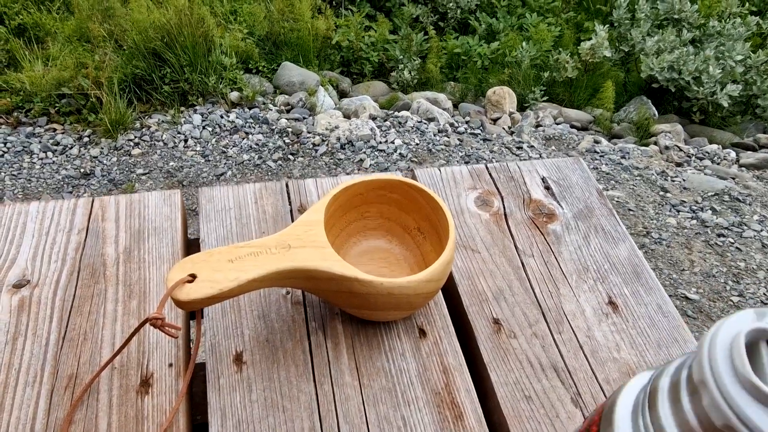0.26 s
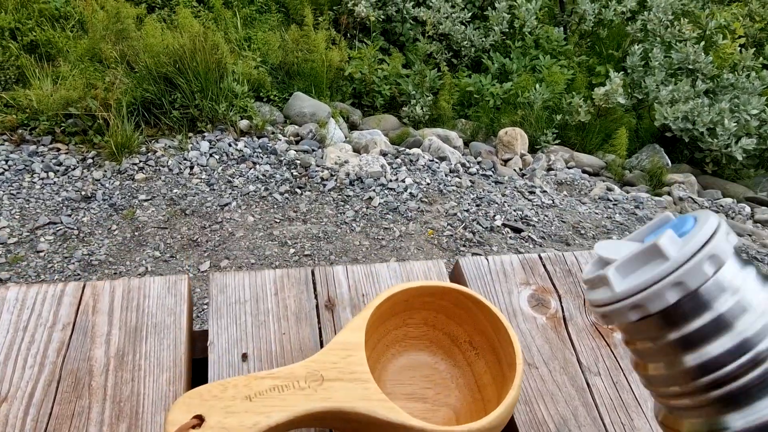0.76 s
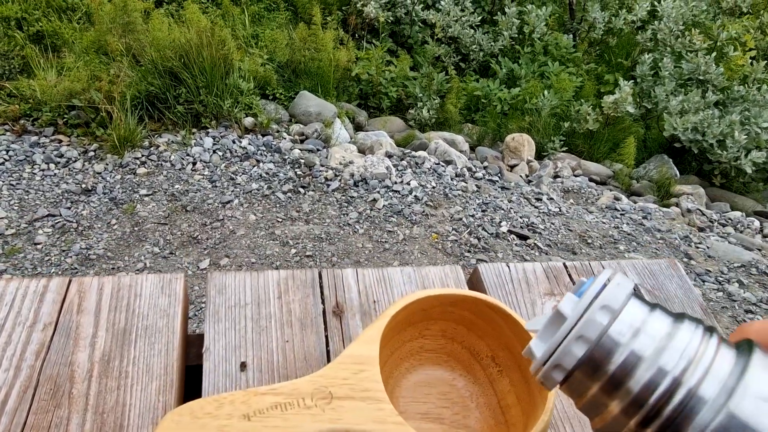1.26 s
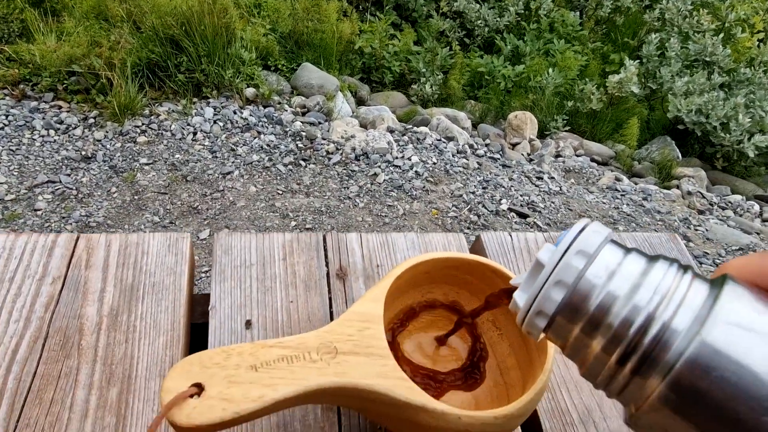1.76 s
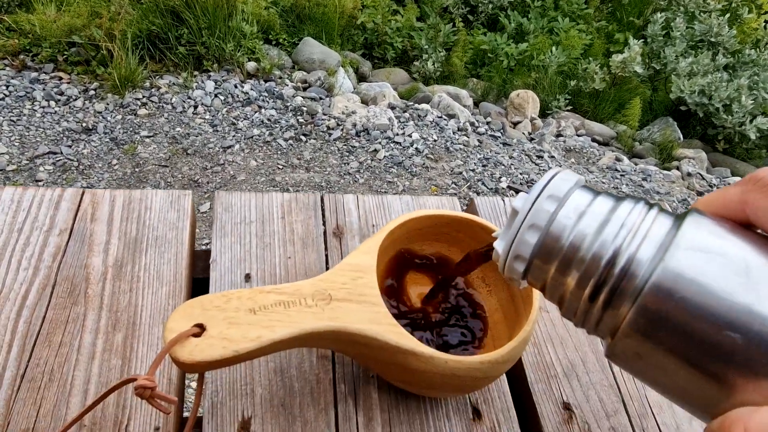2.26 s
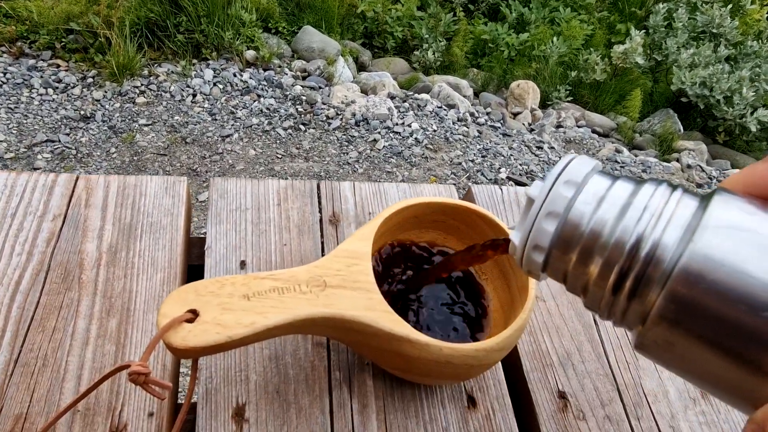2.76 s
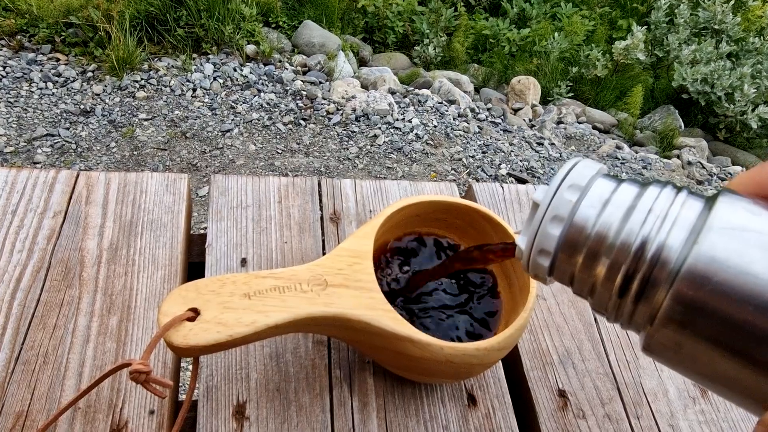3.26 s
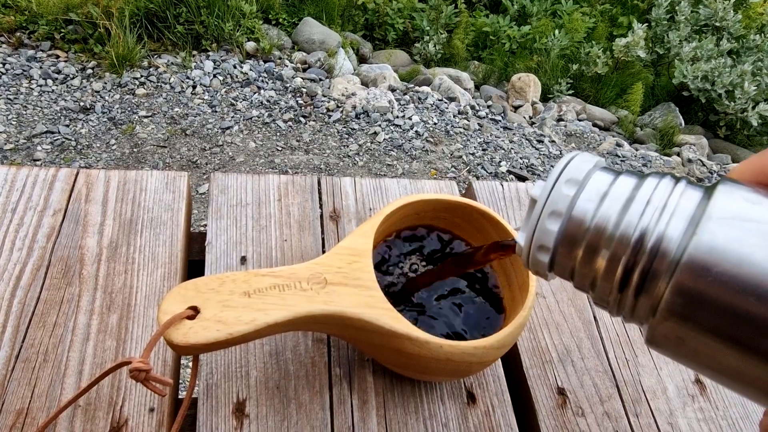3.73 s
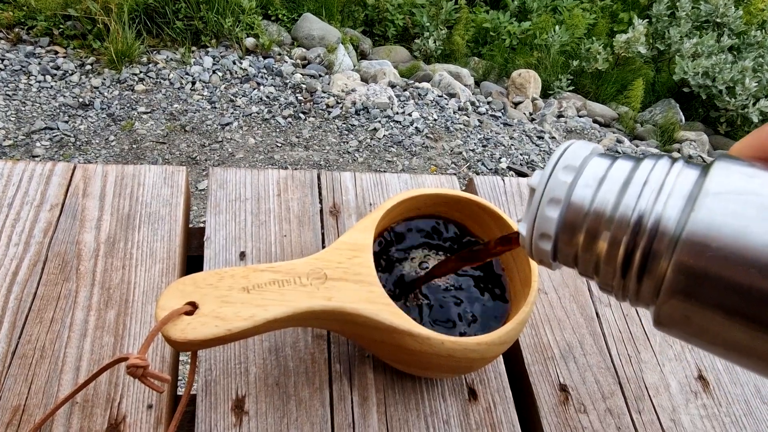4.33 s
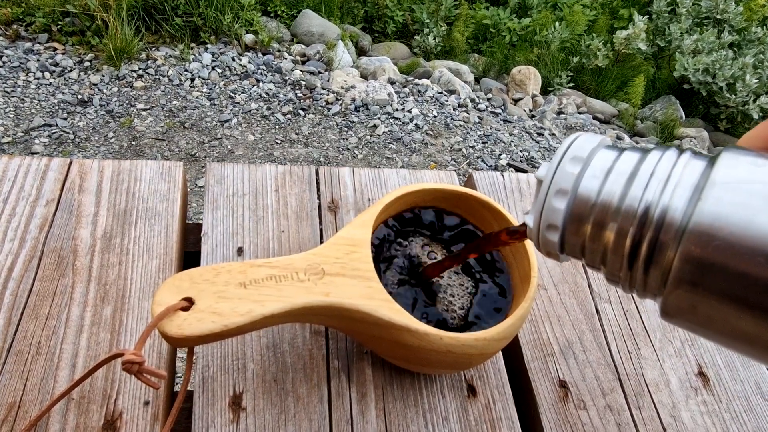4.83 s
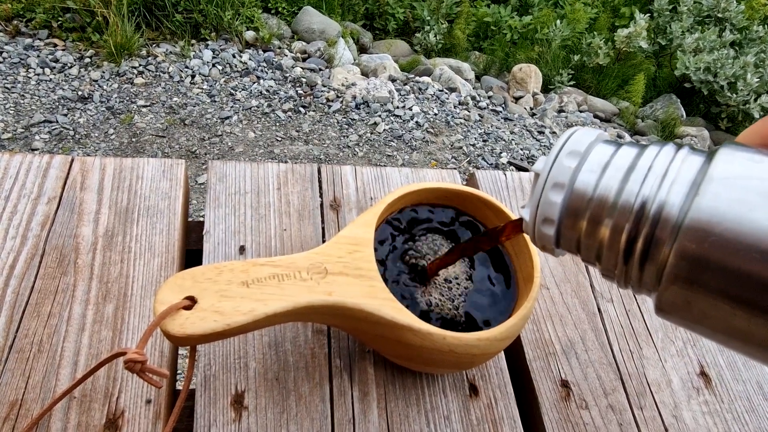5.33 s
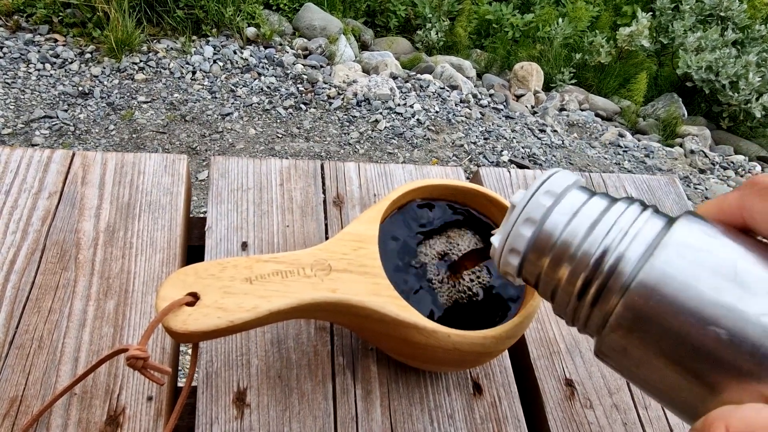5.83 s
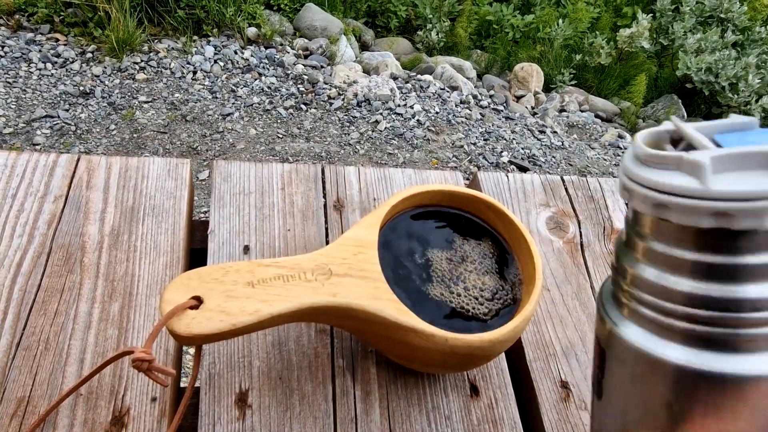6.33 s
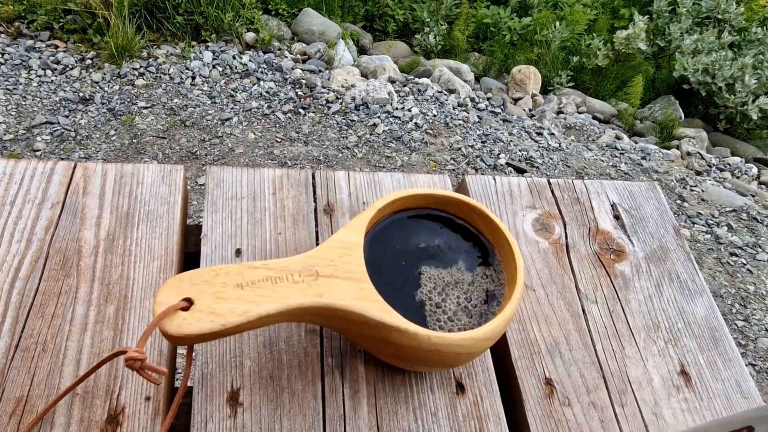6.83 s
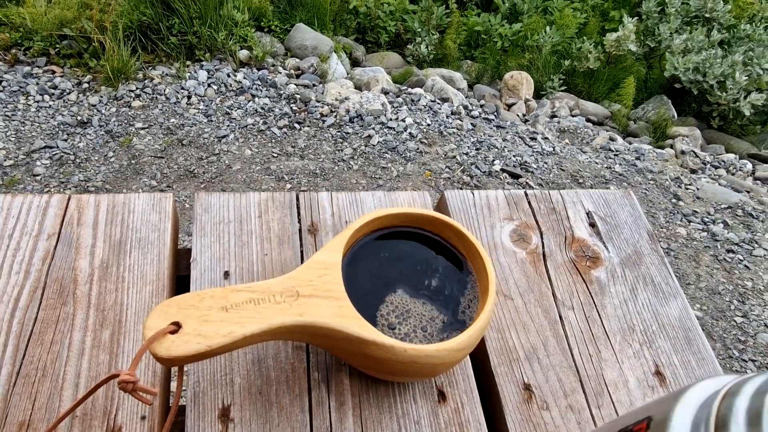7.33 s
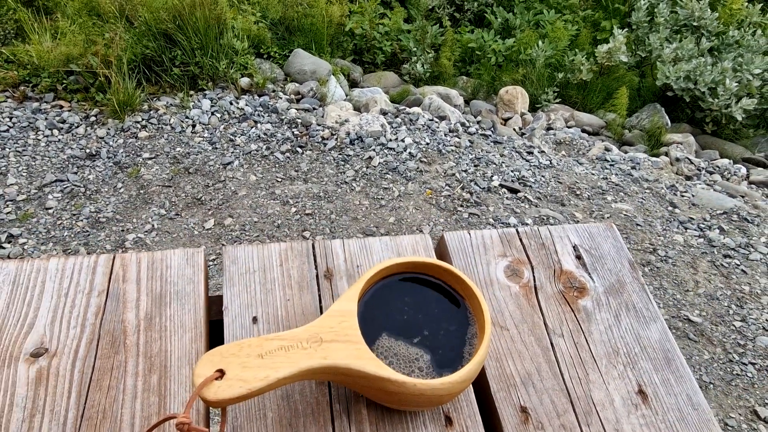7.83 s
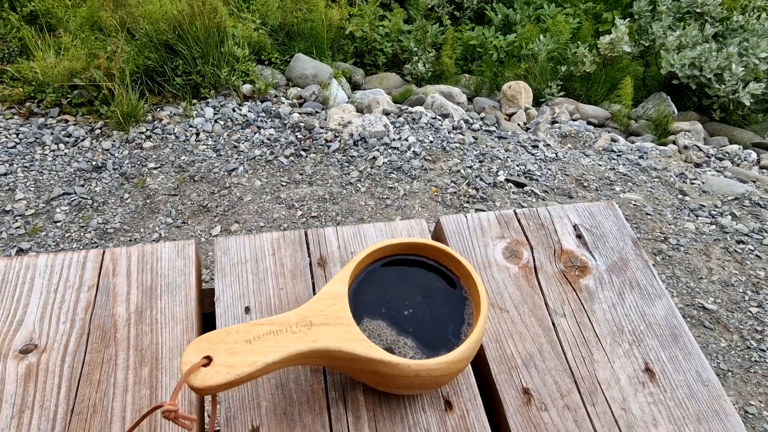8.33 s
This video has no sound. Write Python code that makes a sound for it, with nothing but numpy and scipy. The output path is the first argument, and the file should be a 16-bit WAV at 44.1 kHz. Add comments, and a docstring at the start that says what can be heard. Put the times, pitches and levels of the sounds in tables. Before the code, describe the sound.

Hot coffee trickles from a steel flask into a wooden cup outdoors, bubbling and fizzing, then a sharp stopper click and knocks on planks.

```python
"""Coffee pours in a thin stream from a steel flask into a wooden cup, outdoors, close to a phone.
Trapped bubbles ring and shake the cup, whose lowest mode sinks as it fills; fizz, wet hiss and spray fill the gaps.
Decaying modes and noise bursts make the knocks on a plank table, the stopper snapping shut and the flask set down.
Fingers scrape the steel as stick-slip ticks, a sleeve swishes as shaped noise, and a light wind
buffets the microphone over a faint hush."""
import sys
import numpy as np
from scipy import signal
from scipy.fft import rfft, irfft, next_fast_len
from scipy.io import wavfile
from scipy.ndimage import uniform_filter1d

SR = 44100
rng = np.random.default_rng(int(sys.argv[2]) if len(sys.argv) > 2 else 0)


def bounce(signal):
    """Save signal as a 16-bit WAV file at the path given by the first command-line argument."""
    frames = np.transpose(np.atleast_2d(signal))
    limited = np.clip(frames, -1, 1)
    pcm = np.round(limited * 32767).astype(np.int16)
    wavfile.write(sys.argv[1], SR, pcm)


N = 378819
TIME = np.arange(N) / SR  # seconds

# Table levels are relative: the functions add their trims, scatter and panning.

# Steady outdoor hush. Each row: frequency in Hz, level in dB.
HUSH_COLOUR = [(100, 8.5), (260, 4.5), (800, -3.5), (1600, -0.5), (4200, -7.5), (8500, -8.5), (11000, -23)]

# Wind on the microphone. Each row: time in seconds, level in dB.
WIND_LEVEL = [(0, -62), (.6, -49), (1.05, -38.5), (1.5, -29), (2.3, -29.5), (2.54, -39.5), (3.07, -48),
              (3.2, -41), (4.08, -40.5), (4.3, -56), (4.7, -48), (5.52, -37.5), (5.8, -61.5), (6.15, -60.5),
              (6.4, -51), (7.15, -38.5), (7.7, -49.5), (8.59, -36)]
# Spectrum of the wind rumble. Each row: frequency in Hz, level in dB.
WIND_SPECTRUM = [(12, -31), (22, -7), (48, 0), (70, 1), (130, -17), (330, -42.5), (600, -65), (1200, -78.5),
                 (2000, -110)]
# Strongest eddies hitting a microphone port. Each row: start in seconds, peak in dB.
STRONG_EDDIES = [(1.414, -12), (1.473, -15.5), (1.532, -17), (1.655, -18), (1.745, -19), (1.86, -20),
                 (2.0, -22), (2.119, -15), (2.145, -16), (2.311, -13.5), (3.7, -26.5)]
# Spectrum of an eddy. Each row: frequency in Hz, level in dB.
EDDY_COLOUR = [(25, 0.5), (70, 8.5), (130, 1.0), (300, -31.5), (750, -47), (1500, -73.5), (4000, -100)]

# Moves of the arm in its sleeve. Each row: moment of top speed in seconds, rise in seconds,
# fall in seconds, soft swish in dB, hiss of sliding cloth in dB.
ARM_STROKES = [(0.199, 0.054, 0.046, -57, -49.5), (0.45, 0.34, 0.3, -55, -67),
               (1.0, 0.54, 0.19, -61.5, -83), (1.9, 0.07, 0.23, -62, -76.5),
               (6.39, 0.14, 0.084, -64, -71.5), (6.725, 0.1, 0.1, -104, -54),
               (6.995, 0.15, 0.16, -70.5, -61.5), (7.35, 0.031, 0.033, -54.5, -54),
               (8.48, 0.11, 0.079, -51, -63)]
# Spectrum of the soft swish. Each row: frequency in Hz, level in dB.
SWISH_SPECTRUM = [(300, -4), (1000, -3.5), (1400, 1.5), (2900, -2), (3600, -5), (5500, -5), (11000, -18),
                  (16000, -24.5)]
# Spectrum of the sliding cloth. Each row: frequency in Hz, level in dB.
HISS_SPECTRUM = [(500, -8), (2700, -28.5), (3500, -0.5), (4900, -11), (6500, -2.5), (10500, -6), (13500, 0),
                 (16000, -4)]
# the sleeve never quite rests while the flask is put away
RUSTLE_DB, RUSTLE_FROM_S = -70, 6.3

# Fingers shifting their grip on the flask. Each row: start in seconds, length in seconds, peak in dB.
GRIP_SCRAPES = [(6.33, 0.0093, -40.5), (6.536, 0.017, -46), (6.566, 0.006, -45), (6.69, 0.0078, -58),
                (6.71, 0.037, -42), (6.858, 0.016, -49), (8.05, .008, -45), (8.268, 0.0068, -48)]
# Modes of the steel wall under the hand. Each row: frequency in Hz, level in dB, t60 in seconds.
HAND_DAMPED_STEEL = [(1340, -2, 0.064), (3374, 4, 0.058), (4200, 6, 0.012), (6500, 7, 0.0064)]

# Knocks of flask and hand on the table. Each row: start in seconds, planks in dB, steel ring in dB,
# contact crack in dB, thump cut-off in Hz (lower for a softer contact).
TABLE_KNOCKS = [(0.001, -61.5, -49.5, -45, 710), (0.046, -64, -58, -46.5, 700),
                (0.161, -30.5, -47, -47, 517), (0.197, -38.5, -67, -62, 246), (6.412, -29, -62, -48, 1600),
                (6.452, -44.5, -77, -60.5, 900), (6.752, -55.5, -73, -73, 1200),
                (7.084, -33.5, -44, -27, 1200), (7.321, -57, -68, -49.5, 596),
                (7.356, -37.5, -52, -52.5, 690), (7.868, -12, -31, -34, 1020),
                (8.134, -57.5, -59, -63, 503), (8.194, -36, -67, -51, 346), (8.21, -35, -65, -51.5, 395),
                (8.303, -26, -64.5, -57, 300), (8.495, -19, -88, -48.5, 480), (8.577, -28, -66, -54.5, 400)]
# Modes of the table planks. Each row: frequency in Hz, level in dB, t60 in seconds.
PLANK_MODES = [(166.7, -12.5, 0.26), (204, -1.5, 0.15), (291, 8.5, 0.081), (355, -3, 0.17),
               (405, 0.5, 0.09), (568, -12, 0.12), (638, -5, 0.08), (721, -12.5, 0.14), (1070, -23, 0.021)]
# Modes of the steel flask. Each row: frequency in Hz, level in dB, t60 in seconds.
FLASK_MODES = [(1255, 4.5, 0.066), (1255, 11, .24), (1934, 4.5, 0.12), (2050, -6, 0.25), (3140, -1, 0.26),
               (3250, -13.5, 0.22), (3499, -18, 0.36), (4580, -11.5, 0.41), (5020, -6, 0.29),
               (5460, 8, 0.038), (6220, -5.5, 0.15), (6780, -2, 0.13)]
# Air column shut inside the flask. Each row: frequency in Hz, level in dB, t60 in seconds.
FLASK_AIR_MODES = [(440, -5.5, 0.67), (876, -2.5, 0.33), (1290, -5, 0.46), (1720, 2.5, 0.18),
                   (2220, 1, 0.24), (2640, 1.5, 0.23), (2723, 1, 0.17), (3900, 6, 0.085), (4740, 5, 0.1)]
# Spectra of the dull thud and the contact crack. Each row: frequency in Hz, level in dB.
THUD_COLOUR = [(60, -21), (160, 3.0), (400, 1.0), (800, -12), (1500, -31.5), (4000, -42), (12000, -72.5)]
CRACK_COLOUR = [(400, -17.0), (1500, 15), (3400, 6.5), (4300, -2.5), (5500, 1.5), (7000, -3.5),
                (10000, -8.5), (16000, -19.5)]
KNOCK_LEFT_DB = 7  # extra lean of all knocks, left minus right
REBOUND_S, REBOUND_DB = 0.014, -10  # every contact touches a second time
FULL_FLASK_SAG = 0.0406  # share by which the flask rings lower before it is poured from

# The plastic stopper being pressed shut. Each row: start in seconds, peak in dB.
STOPPER_SNAPS = [(7.0165, -23), (7.0816, -18.5), (7.0843, -3), (7.0854, -8.5), (7.0859, -21.5)]
# Spectrum of the snaps. Each row: frequency in Hz, level in dB.
SNAP_SPECTRUM = [(250, -15), (550, -0.5), (980, -17), (1200, -6.5), (1450, -10.5), (2700, -3),
                 (3500, -10.5), (4100, -5.5), (6300, -14.5), (8100, -14.5), (11000, -25.5), (13300, -18),
                 (16000, -29)]
# Modes of the plastic stopper. Each row: frequency in Hz, level in dB, t60 in seconds.
STOPPER_MODES = [(1210, 2.5, 0.062), (2710, -0.5, 0.028), (3124, 3, 0.043)]

# Spray ticking against the cup. Each row: start in seconds, peak in dB, pitch in Hz.
SPRAY_TICKS = [(2.3625, -48.5, 7350), (2.5977, -40, 8660), (2.679, -42, 7200), (2.997, -43, 7600),
               (3.07, -42, 7600), (3.3187, -41.5, 8600), (3.4596, -39.5, 4920), (3.517, -36.5, 9400),
               (3.633, -40, 13300), (3.868, -43, 11600), (3.9749, -42.5, 11200), (4.0128, -41.5, 12900),
               (4.1127, -40, 11100), (4.3859, -42, 7400), (4.589, -40.5, 4670), (5.9288, -39.5, 6040)]
# Spectra of the bright ticks and the faint splashes. Each row: frequency in Hz, level in dB.
TICK_COLOUR = [(1000, -28.0), (4000, -0.5), (6000, -1.5), (7800, 2), (10500, -3), (14000, -6.0)]
SPLASH_COLOUR = [(1500, -34), (4000, -6.5), (6300, 4.5), (9000, -4.5), (11000, -12.5), (15000, -14)]

# Spectrum of the stream's wet hiss. Each row: frequency in Hz, level in dB.
WASH_COLOUR = [(400, -12), (700, -29), (1500, 25), (2400, 18.0), (4200, -13.0), (6500, -31), (15000, -40.0)]

# Fizz of small bubbles under the stream. Each row: time in seconds, level in dB.
FIZZ_LEVEL = [(2.15, -84), (2.5, -69.5), (2.75, -57.5), (3.27, -74.5), (3.48, -63), (3.82, -62.5),
              (4.0, -59.5), (4.33, -62), (4.85, -62), (5.66, -64.5), (5.78, -69.5), (6.08, -72)]
POUR_START_S, POUR_END_S = FIZZ_LEVEL[0][0], FIZZ_LEVEL[-1][0]
# the fizz thins while the stream digs the hollow that becomes a single bubble: lead, width and depth
LULL_LEAD_S, LULL_S, LULL_DB = 0.036, 0.017, -4.5
# a weak stream traps smaller bubbles: base pitch at full flow, that flow's level, dB lost per octave of rise
FIZZ_HZ, FULL_FLOW_DB, FLOW_DB_PER_OCTAVE = 1798, -60.5, 14

# Lowest mode of the cup, loaded by more and more liquid. Each row: time in seconds,
# frequency in Hz, strength of its answer in dB.
CUP_LOWEST_MODE = [(2.1, 2280, -16), (3.1, 1465, -11.5), (3.9, 1064, -10), (4.4, 956, -3.5),
                   (5.15, 860, -7), (5.9, 770, -17)]
# Upper modes of the cup. Each row: frequency in Hz, level in dB, t60 in seconds.
CUP_UPPER_MODES = [(1548, 0.5, 0.036), (2044, 10.5, 0.019), (2518, 2, 0.02), (3358, 9.5, 0.012),
                   (4750, -0.5, 0.014), (6100, -12, 0.01)]

# Single bubbles heard one by one, from faint early chirps through loud glugs to last drips.
# Each row: start in seconds, peak in dB, pitch in Hz.
SINGLE_BUBBLES = [(2.082, -44.5, 1510), (2.303, -52, 2460), (2.36, -50.5, 1856), (2.485, -45.5, 3170),
                  (2.598, -40.5, 2720), (2.6774, -35.5, 1610), (2.7046, -41.5, 3060), (2.759, -38.5, 1920),
                  (2.785, -41, 1850), (2.8416, -30, 1666), (2.921, -45.5, 2010), (2.954, -39, 2510),
                  (3.0757, -35, 1337), (3.148, -42.5, 1446), (3.1733, -45, 1800), (3.3179, -28.5, 2115),
                  (3.3523, -48, 2050), (3.436, -38.5, 2090), (3.461, -35, 2170), (3.521, -40, 1490),
                  (3.5443, -41.5, 1415), (3.6318, -32.5, 1610), (3.657, -43, 1580), (3.669, -34.5, 1404),
                  (3.803, -42, 1425), (3.8843, -28, 1450), (3.902, -32.5, 1510), (3.9454, -41, 1440),
                  (3.974, -33, 1390), (3.996, -37, 1530), (4.0135, -36, 1540), (4.0503, -38, 1860),
                  (4.1125, -28.5, 1530), (4.138, -39, 1340), (4.2301, -40, 1890), (4.2991, -45, 2140),
                  (4.3863, -27, 2100), (4.4343, -42, 2080), (4.451, -42, 2160), (4.517, -38, 1450),
                  (4.5577, -39.5, 2220), (4.5878, -34, 1660), (4.615, -35, 1595), (4.6967, -43, 1580),
                  (4.7262, -30.5, 2010), (4.816, -36, 2060), (4.833, -43, 1590), (4.8756, -38, 2190),
                  (4.9746, -39.5, 1586), (5.0603, -42.5, 1510), (5.1194, -40, 2070), (5.1674, -44, 1820),
                  (5.1918, -36, 1890), (5.33, -45, 1740), (5.391, -36.5, 2185), (5.4155, -41.5, 2040),
                  (5.5125, -37, 1520), (5.5757, -39.5, 2180), (5.6156, -44.5, 2280), (5.6356, -41, 2690),
                  (5.809, -49.5, 2720), (5.9028, -47, 3530), (5.949, -44, 2130)]
# each sheds a train of further ones: longest delay, starting level, fade with delay
TRAIN_S, TRAIN_DB, TRAIN_FADE_DB_PER_S = 0.039, -10.5, 129


def undb(db):
    """Decibels to gain."""
    return 10 ** (np.asarray(db) / 20)


def curve(rows, at=TIME):
    """The columns of a time table, joined by straight lines."""
    s, *columns = np.transpose(rows)
    return [np.interp(at, s, column) for column in columns]


def tint(x, colour):
    """Colour a sound with the causal, minimum-phase filter of the given (Hz, dB) response."""
    size = x.shape[-1]
    hz, db = np.transpose(colour)
    padded = 2 * next_fast_len(size // 2 + 2048)
    bins_hz = np.fft.rfftfreq(padded, 1 / SR)
    response_db = np.interp(np.log(bins_hz + 1), np.log(hz), db)
    cepstrum = irfft(np.log(undb(response_db)))
    # folding the cepstrum forward in time makes the filter causal
    cepstrum[1:padded // 2] *= 2
    cepstrum[padded // 2 + 1:] = 0
    return irfft(rfft(x, padded) * np.exp(rfft(cepstrum)))[..., :size]


def noise(colour, likeness=0):
    """Coloured stereo noise of rms 1; likeness sets the part shared by both sides."""
    layers = tint(rng.standard_normal((3, N)), colour)
    x = layers[:2] + likeness * layers[2]
    return x / x.std()


def walk(rate):
    """Smooth random wander with a spread near 1, drawing rate new values a second."""
    k = int(SR / rate)
    steps = np.repeat(rng.standard_normal(N // k + 1), k)
    return 1.3 * uniform_filter1d(uniform_filter1d(steps, k), k)[:N]


def ring(modes, t, lead=0):
    """Damped modes (Hz, dB, t60) after a blow; the left side leads by the given radians."""
    hz, db, t60 = np.transpose(modes)[:, :, None]
    decay = np.log(1000) / t60
    z = (undb(db) * np.exp((2j * np.pi * hz - decay) * t)).sum(0)
    return np.array([z.imag, (z * np.exp(-1j * lead)).imag])


def burst(t, t60):
    """Stereo noise dying away."""
    return rng.standard_normal((2, len(t))) * undb(-60 * t / t60)


def strength(x, db, size=900):
    """Scale a hit so that its first size samples have the given rms."""
    return x * undb(db) / x[:, :size].std()


def peak(x, db):
    """Scale a hit to the given peak."""
    return x * undb(db) / np.abs(x).max()


def pan(x, db):
    """Lean a stereo sound to the left by db."""
    return x * undb(np.array([[db], [-db]]) / 2)


def add(out, s, x):
    """Mix x into out from time s."""
    i = int(np.clip(s * SR, 0, N - 1))
    out[:, i:i + x.shape[1]] += x[:, :N - i]


def hush(hush_db=-69):
    """Faint, nearly even rush of the open air: coloured noise with a slow wander."""
    return pan(noise(HUSH_COLOUR) * undb(hush_db + .5 * walk(1.0)), 1.2)


def wind(wind_db=2.0, eddy_db=4.0, buffet_db=-4, small_db=2, scatter_db=2.0, count=60):
    """Wind rumbles on the microphone ports, the right one more; eddies thump it, harder as it blows harder."""
    level = curve(WIND_LEVEL)[0] + wind_db + eddy_db * walk(22)
    out = pan(noise(WIND_SPECTRUM, likeness=1.31) * undb(level), -3.5)
    t = TIME[:SR // 10]
    # small eddies come one to each equal slice of time
    times = TIME[-1] * (np.arange(count) + rng.random(count)) / count
    levels = curve(WIND_LEVEL, times)[0] + small_db + scatter_db * rng.standard_normal(count)
    for s, db in list(STRONG_EDDIES) + list(zip(times, levels)):
        mono_burst = burst(t, 0.054)[[0, 0]]
        eddy = tint(mono_burst * (1 - np.exp(-t / 0.0027)), EDDY_COLOUR)
        add(out, s, pan(peak(eddy, db + buffet_db), -12.5))
    return out


def sleeve(swish_db=0, hiss_db=0, grain_db=1.17):
    """Cloth friction follows the arm's speed: a soft swish as it moves, a hiss where it slides."""
    # the rustle fades in over one second
    swish = undb(RUSTLE_DB) * np.clip(TIME - RUSTLE_FROM_S, 0, 1)
    sliding = 0
    for s, rise, fall, soft_db, slide_db in ARM_STROKES:
        speed = np.exp(-((TIME - s) / np.where(TIME < s, rise, fall)) ** 2)
        swish = np.hypot(swish, speed * undb(soft_db + swish_db))
        sliding = np.hypot(sliding, speed * undb(slide_db + hiss_db))
    cloth = swish * noise(SWISH_SPECTRUM) + sliding * noise(HISS_SPECTRUM)
    return pan(cloth * undb(grain_db * walk(140)), 7.3)


def scrapes(scrape_db=0, slips_per_s=500):
    """Fingers stick and slip on the steel: a short run of tiny ticks into its hand-damped modes."""
    out, t = np.zeros((2, N)), TIME[:SR // 10]
    wall = ring(HAND_DAMPED_STEEL, t, lead=1.35)
    for s, length, db in GRIP_SCRAPES:
        slips = (rng.random(len(t)) < slips_per_s / SR) * rng.standard_normal(len(t)) * (t < length)
        slips[0] = 1
        add(out, s, peak(signal.fftconvolve(wall, slips[None], axes=1), db + scrape_db))
    return pan(out, 8.0)


def knocks(plank_db=0, steel_db=1, crack_db=0, thud_db=-7, air_db=-19):
    """Each contact thumps the planks, rings the flask and cracks; a soft one stirs only the low plank modes."""
    out, t = np.zeros((2, N)), TIME[:SR // 2]
    for s, wood, steel, contact, cutoff_hz in TABLE_KNOCKS:
        planks, flask = np.array(PLANK_MODES, float), np.array(FLASK_MODES, float)
        # where the blow lands decides how strongly each mode answers
        planks[:, 1] += 2 * rng.standard_normal(len(planks))
        flask[:, 1] += 2 * rng.standard_normal(len(flask))
        flask[:, 0] *= 1 - FULL_FLASK_SAG * (s < POUR_START_S)

        thud = tint(burst(t, 0.16)[[0, 0]], THUD_COLOUR)
        body = strength(ring(planks, t, lead=0.39), 0) + strength(thud, thud_db)
        body = body * (1 - np.exp(-t / 0.00066))
        body = signal.sosfilt(signal.butter(2, cutoff_hz, fs=SR, output="sos"), body)
        crack = tint(burst(t, 0.045) + 0.1 * burst(t, 0.27), CRACK_COLOUR)

        # after the first snap, the wall also stirs the lowest mode of the air inside
        air = strength(ring(FLASK_AIR_MODES[:1], t), steel + air_db) * (s > STOPPER_SNAPS[0][0])
        metal = pan(strength(ring(flask, t, lead=1.42), steel + steel_db) + air, 1.7)
        thump = pan(strength(body, wood + plank_db), -5.5)
        add(out, s, thump + metal + strength(crack, contact + crack_db))
        add(out, s + REBOUND_S, strength(crack, contact + crack_db + REBOUND_DB))
    return pan(out, KNOCK_LEFT_DB)


def stopper(snap_db=1, tail_db=-22, far_db=-49, air_db=-38, cap_db=-21):
    """The stopper's catch slips and slams home; the plastic rings briefly and the trapped air sings on."""
    out, t = np.zeros((2, N)), TIME[:SR // 2]
    for s, db in STOPPER_SNAPS:
        click = burst(t, .017) + undb(tail_db) * burst(t, .08) + undb(far_db) * burst(t, .35)
        snap = tint(click * (1 - np.exp(-t / 0.00042)), SNAP_SPECTRUM)
        add(out, s, pan(peak(snap, db + snap_db), 0.073))
    # the loudest snap is the slam home
    home = max(STOPPER_SNAPS, key=lambda snap: snap[1])[0]
    plastic = strength(ring(STOPPER_MODES, t, lead=1.8), cap_db)
    air = strength(ring(FLASK_AIR_MODES, t, lead=0.98), air_db)
    add(out, home, pan(plastic + air, 3.2))
    return out


def flow(at=TIME):
    """Level of the fizz in dB, with a lull just before each single bubble."""
    starts = np.sort(np.append(np.array(SINGLE_BUBBLES)[:, 0], TIME[-1]))
    ahead = starts[np.searchsorted(starts, at)] - at
    return curve(FIZZ_LEVEL, at)[0] + LULL_DB * np.exp(-((ahead - LULL_LEAD_S) / LULL_S) ** 2)


def spatter(tick_db=2, tone=0.78, fine_db=6, spread_db=4, deepening_db_per_s=-1.0, fall_back_db=-11, count=150):
    """Droplets and tiny bursting bubbles: a few bright ticks, and many faint ones that follow the fizz."""
    out, t = np.zeros((2, N)), TIME[:1200]
    wetting = (1 - np.exp(-t / 0.00036)) ** 2
    for s, db, hz in SPRAY_TICKS:
        # the spray leaps up, and a drop of it falls back a moment later
        for delay, drop_db in ((0, 0), (rng.uniform(0.011, 0.032), fall_back_db)):
            crack = tint(burst(t, 0.012) + 0.029 * burst(t, 0.037), TICK_COLOUR)
            tick = (tone * ring([(hz, 0, .012)], t, lead=1.63) + crack) * wetting
            add(out, s + delay, pan(peak(tick, db + tick_db + drop_db), 3.8))

    times = rng.uniform(POUR_START_S, POUR_END_S, count)
    # the deepening pool cushions the stream, so it spits less and less
    levels = flow(times) + fine_db + deepening_db_per_s * (times - times.mean())
    for s, db, (pitch, size) in zip(times, levels, rng.standard_normal((count, 2))):
        splash = tint(burst(t, 0.011), SPLASH_COLOUR)
        blip = ring([(6300 * np.exp(.22 * pitch), 0, .005)], t, lead=2.4) + 0.8 * splash
        add(out, s, pan(peak(blip * wetting, db + spread_db * min(size, 1.8)), 14.6))
    return out


def wash(wash_db=-10.0, flutter_db=4, fade_s=0.13):
    """The wobbling stream sliding into the pool: a soft, fluttering wet hiss between the bubbles."""
    inside_s = np.minimum(TIME - POUR_START_S, POUR_END_S - TIME)
    running = np.clip(inside_s / fade_s, 0, 1)
    level = flow() + wash_db + flutter_db * walk(70)
    return pan(noise(WASH_COLOUR) * running * undb(level), 5.4)


def bubble(s, hz, t, cycles=31, glide=0.027, cup_db=-11, small_db_per_octave=10, scatter_db=4, reach=0.37,
           thump_db=-30, click_db=-38):
    """A bubble pinches off and rings, rising in pitch; it shakes the cup's lowest mode and those near its pitch."""
    modes = np.array([(*curve(CUP_LOWEST_MODE, s), .045)] + list(CUP_UPPER_MODES), float)
    chance = rng.standard_normal((3, len(modes)))
    # the sloshing liquid keeps detuning the cup
    modes[:, 0] *= 1 + .04 * chance[0]
    modes[:, 1] += cup_db + scatter_db * chance[1]
    # upper modes lose 6 dB for every reach octaves away from the bubble
    modes[1:, 1] -= 6 * np.abs(np.log2(modes[1:, 0] / hz)) / reach
    # small bubbles hardly move the lowest mode
    modes[0, 1] -= small_db_per_octave * max(np.log2(hz / FIZZ_HZ), 0)

    life = cycles / hz * np.exp(.3 * chance[2, 0])  # t60 in seconds
    own = ring([(hz, 0, life)], t * (1 + glide * t / life), lead=1.0)
    thump = ring([(346.0, thump_db, 0.021)], t)
    tones = pan(own + ring(modes, t, lead=1.0) + thump, 12.2)
    neck_closing = (1 - np.exp(-t / .0014)) ** 2
    return (tones + undb(click_db) * burst(t, 0.017)) * neck_closing


def fizz(fizz_db=1.5, size_db=5.5, count=480):
    """A crowd of small bubbles whose loudness follows the stream."""
    out, t = np.zeros((2, N)), TIME[:1800]
    # the deeper the pool, the more air the stream drags in
    times = POUR_START_S + (POUR_END_S - POUR_START_S) * rng.random(count) ** .75
    octaves = np.clip((FULL_FLOW_DB - curve(FIZZ_LEVEL, times)[0]) / FLOW_DB_PER_OCTAVE, 0, 1)
    for s, up, (pitch, size) in zip(times, octaves, rng.standard_normal((count, 2))):
        # small bubbles sing higher and are weaker; a shallow pool holds no big ones
        free_hz = FIZZ_HZ * 2 ** up * np.exp(.36 * pitch)
        hz = np.hypot(curve(CUP_LOWEST_MODE, s)[0], free_hz)
        add(out, s, peak(bubble(s, hz, t), size_db * min(size, 1.5) - 2.5 * max(pitch, 0)))
    # scale the whole crowd to rms 1 over the pour, then let the flow set its level
    crowd_rms = out[:, int(POUR_START_S * SR):int(POUR_END_S * SR)].std()
    return out / crowd_rms * undb(flow() + fizz_db)


def pour(bubble_db=3.0, count=3):
    """The stream traps single bubbles, each trailed by a few weaker ones, mostly higher in pitch."""
    out, t = np.zeros((2, N)), TIME[:1800]
    for s, db, hz in SINGLE_BUBBLES:
        add(out, s, peak(bubble(s, hz, t), db + bubble_db))
        for share, pitch, size in rng.uniform((0, -.12, -5), (1, .3, 3), (count, 3)):
            delay = TRAIN_S * share
            train_db = TRAIN_DB - TRAIN_FADE_DB_PER_S * delay + size
            add(out, s + delay, peak(bubble(s, hz * np.exp(pitch), t), db + bubble_db + train_db))
    return out


def scene():
    """Everything that sounds at the table."""
    background = hush() + wind()
    handling = sleeve() + scrapes() + knocks() + stopper()
    coffee = spatter() + wash() + fizz() + pour()
    return background + handling + coffee


def record(dry):
    """The phone clips at full scale and cuts the top above 16.2 kHz."""
    top_cut = signal.ellip(10, .2, 70, 16200, fs=SR, output="sos")
    return signal.sosfilt(top_cut, np.clip(dry, -1, 1))


dry = scene()
out = record(dry)
bounce(out)
```